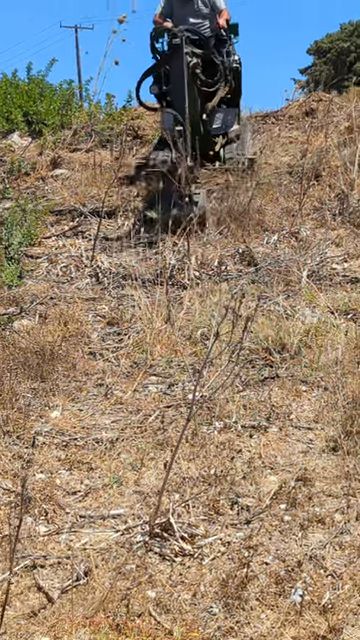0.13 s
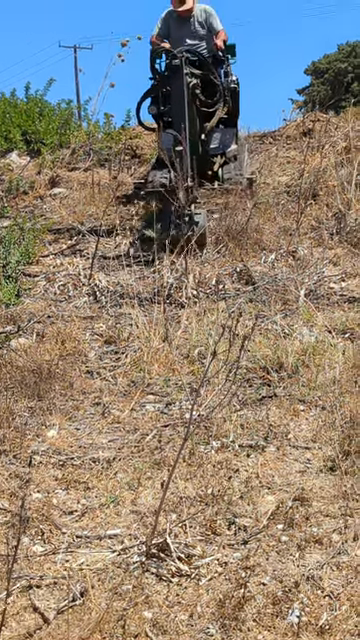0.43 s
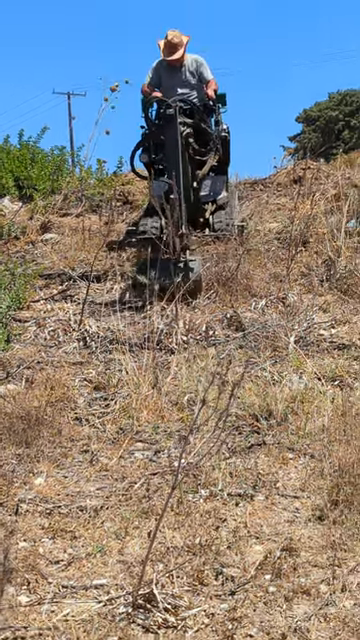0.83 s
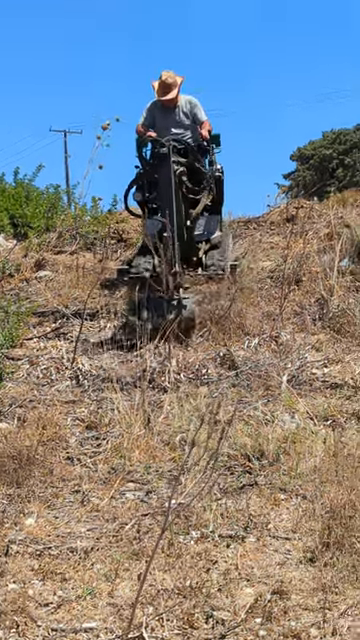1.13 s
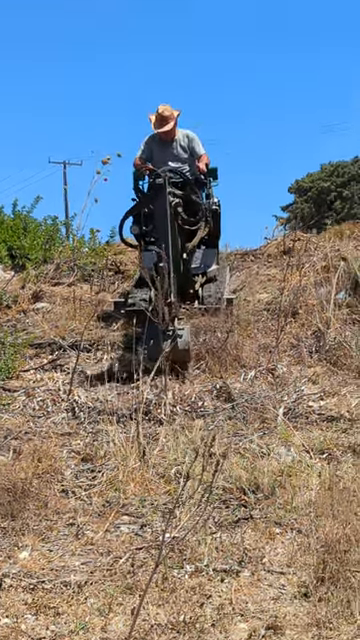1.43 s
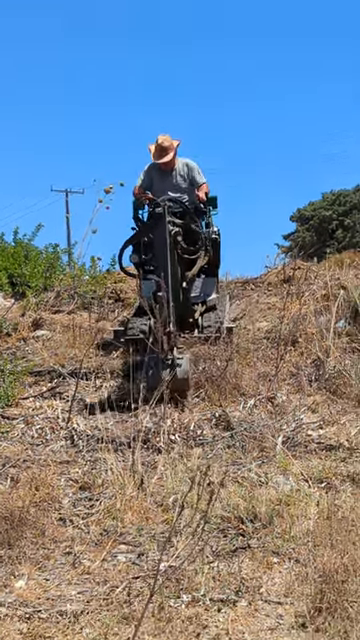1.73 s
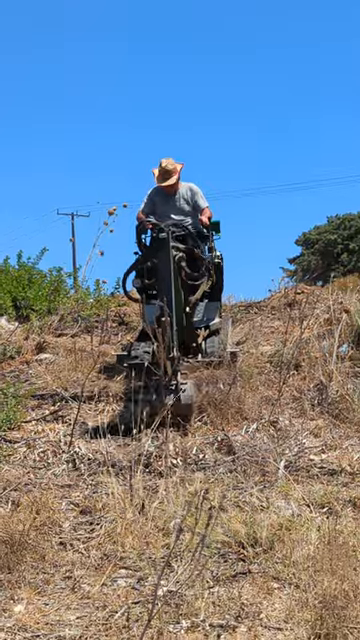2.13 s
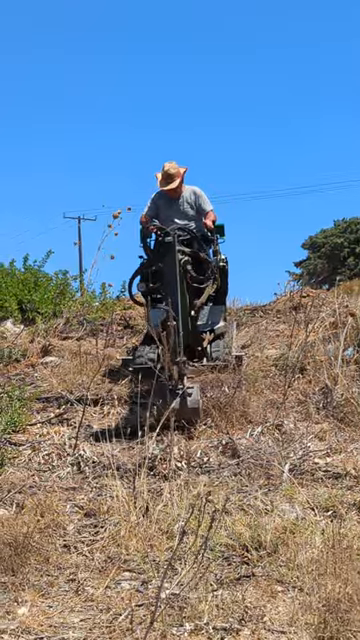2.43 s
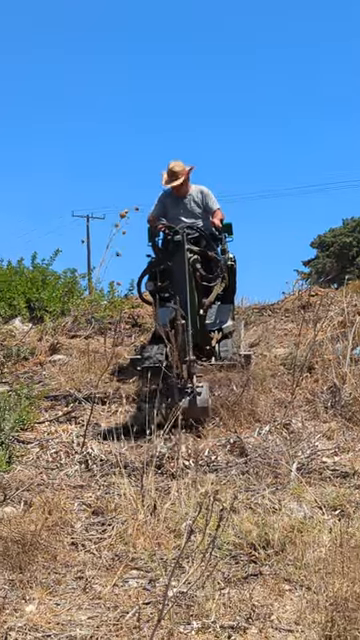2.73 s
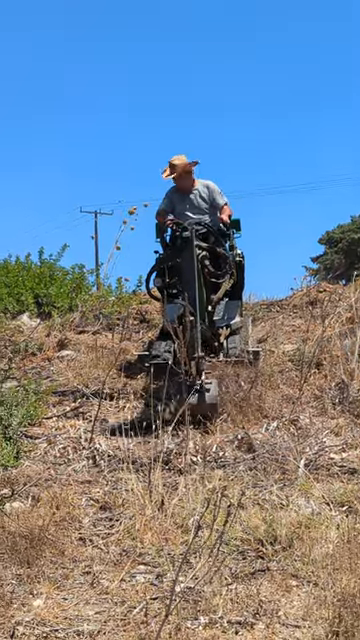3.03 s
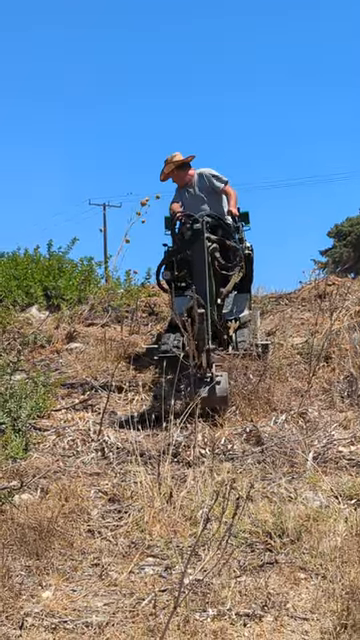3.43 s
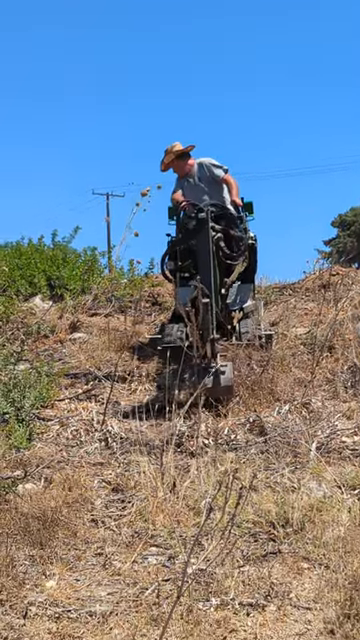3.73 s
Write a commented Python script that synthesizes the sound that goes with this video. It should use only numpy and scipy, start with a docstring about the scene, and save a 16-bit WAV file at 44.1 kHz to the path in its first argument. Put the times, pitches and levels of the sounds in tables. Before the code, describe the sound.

Steady rapid chugging of a small digger's engine in the open, with mechanical rattle, light linkage clanks and brittle snaps. Low gusts thud on the stereo handheld microphone throughout, over a thin insect hiss.

```python
"""Small excavator on a dry slope

A single-cylinder engine holds fairly steady revs: pulse-driven exhaust harmonics thump, noise that jumps
at each firing clatters and rings the casing, and damped sine clusters make the loose linkage clank.
Patchy noise hisses as insects in the scrub; noise bursts are snapping dry stalks. Low noise swells are gusts
on the two microphone ports of a handheld camera, whose limiter ducks the whole mix under strong peaks."""
import sys
import numpy as np
from scipy import signal
from scipy.fft import rfft, irfft, next_fast_len
from scipy.io import wavfile
from scipy.ndimage import uniform_filter1d, minimum_filter1d, map_coordinates

SR = 44100
rng = np.random.default_rng(int(sys.argv[2]) if len(sys.argv) > 2 else 0)


def generate_wav(signal):
    """Clip the signal to [-1, 1] and save it as 16-bit WAV at the path in sys.argv[1]."""
    frames = np.transpose(np.atleast_2d(signal))
    scaled = np.clip(frames, -1, 1) * 32767
    pcm = np.round(scaled).astype(np.int16)
    wavfile.write(sys.argv[1], SR, pcm)


def magnitude_from_level(level_db):
    """Linear magnitude for a level in decibels (20 dB per decade)."""
    exponent = np.asarray(level_db, float) / 20
    return 10 ** exponent


N = 171990


def unit(x):
    """Scales a signal to rms 1."""
    return x / np.sqrt(np.mean(x ** 2) + 1e-20)


def along(points, hz):
    """Reads (frequency, value) points on a logarithmic frequency axis."""
    f, v = np.transpose(points)
    return np.interp(np.log(hz + 1), np.log(f + 1), v)


def curve(rows):
    """Draws straight lines through (time, value) rows, one value per sample."""
    return np.interp(np.arange(N) / SR, *np.transpose(rows))


def wobble(rate):
    """A smooth random curve with rate knots a second."""
    knots = rng.standard_normal(int(N * rate / SR) + 4)
    return map_coordinates(knots, [np.arange(N) * rate / SR])


def filtered(x, response):
    """Multiplies the spectrum of x by a complex response of frequency."""
    size = next_fast_len(N + 8192)
    spectrum = rfft(x, size) * response(np.fft.rfftfreq(size, 1 / SR))
    return irfft(spectrum, size)[..., :N]


def patchy(depth_db):
    """Two unrelated noises sharing time-frequency patches of random gain."""
    z = signal.stft(rng.standard_normal((2, N)), nperseg=512)[2]
    field = uniform_filter1d(rng.standard_normal(z.shape[1:]), size=6, axis=0)
    field = uniform_filter1d(field, size=10, axis=1)
    return signal.istft(z * magnitude_from_level(depth_db * unit(field)), nperseg=512)[1][:, :N]


def pair(noises, gain, alike):
    """Colours two noises and mixes them to a left-right likeness, at rms 1."""
    def shares(hz):
        angle = np.arccos(np.clip(along(alike, hz), -1, 1)) / 2
        return gain(hz) * [np.cos(angle), np.sin(angle)]

    mid, side = filtered(noises, shares)
    return unit(np.array([mid + side, mid - side]))


def train(times, sizes):
    """Impulses, each shared between its two neighbouring samples."""
    at = np.clip(times * SR, 0, N - 2)
    k = at.astype(int)
    return np.bincount(k, sizes * (1 + k - at), N) + np.bincount(k + 1, sizes * (at - k), N)


# Engine speed: time_s, firings_per_s
ENGINE_SPEED = [(0, 25.12), (.5, 25.3), (.68, 25.4), (1.05, 25.26), (1.28, 25.42), (1.8, 25.48),
                (2.3, 25.27), (2.8, 25.38), (3.3, 25.12), (3.9, 25.19)]


def firings():
    """Times of the power strokes, one at each whole turn of the summed firing rate."""
    first_s = .0125
    turns = np.cumsum(curve(ENGINE_SPEED)) / SR - first_s * ENGINE_SPEED[0][1]
    return np.interp(np.arange(int(turns[-1]) + 1), turns, np.arange(N) / SR)


# Exhaust harmonics at 1, 2, 3 .. times the firing rate, before the exhaust gain: level_db
EXHAUST_ORDERS = [-60, -41, -37.5, -31, -25.5, -29.5, -45, -36, -33, -52, -45, -43, -59, -50, -46, -48.5,
                  -46.5, -46.5, -51, -47.5, -43.5, -54, -57, -58.5, -49, -47, -50, -51, -49.5, -46, -62,
                  -63, -57, -50.5, -54, -46.5, -55.5, -66, -56, -59.5, -67, -76, -60, -53, -66, -60, -58,
                  -68]


def exhaust(times):
    """Harmonics phased as a suck-and-push puff, its inverted echo and a valve pop; upper phases scatter."""
    exhaust_db, size_scatter_db, jitter_s = 1.5, 1.6, .00013
    puff_s, valve_s, valve_gain = .002, .028, .4  # a weaker pop as the valve shuts
    echo_s, echo_gain, echo_dull_hz = .0115, .95, 450  # the puff returns inverted from the pipe's end
    blur_from, blur_radians = 12, 1.25  # casing and ground scatter the orders above this one
    order = np.arange(len(EXHAUST_ORDERS)) + 1
    rate = np.mean(curve(ENGINE_SPEED))
    blur = blur_radians * rng.standard_normal(len(order)) * (order > blur_from)

    def late(f, s):
        return np.exp(-2j * np.pi * f * s)

    def cycle(f):
        valve = valve_gain * late(f, valve_s)
        echo = 1j * echo_gain * late(f, echo_s) / (1 + (f / echo_dull_hz) ** 2)
        return late(f, puff_s) * (valve - 1j + echo)

    def pipe(f):
        gain = magnitude_from_level(np.interp(f / rate, [0, *order, 2 * order[-1]], [-80, *EXHAUST_ORDERS, -100]))
        phase = np.angle(cycle(f)) + np.interp(f / rate, order, blur)  # cycle gives phase only
        return gain * np.exp(1j * phase)

    chance = rng.standard_normal((len(times), 2))
    sizes = magnitude_from_level(exhaust_db + size_scatter_db * chance[:, 1])
    pulses = train(times + jitter_s * chance[:, 0], sizes)
    return filtered(pulses, pipe) * SR / rate / np.sqrt(2)  # a steady harmonic gets rms 1 before gain


# Clatter colour before the casing rings, relative: pitch_hz, level_db
CLATTER_COLOUR = [(330, -26), (560, -4.5), (740, 0.5), (840, -8), (960, -11.5), (1150, -7.5), (1330, -10.5),
                  (1530, -14.5), (1800, -10.5), (2150, -11), (2600, -20), (3400, -17.5), (4300, -19.5),
                  (4800, -24.5), (5500, -29), (8000, -27.5), (11000, -53), (19000, -120)]
# Casing rings, added to the plain response of 1: pitch_hz, width_hz, level_db
CASING_RINGS = [(1122, 34, -1.5), (2102, 61, 0), (3744, 76, 4.5), (4187, 195, 4), (4656, 72, 9),
                (6080, 68, 3)]
# Left-right likeness of the clatter: pitch_hz, likeness
CLATTER_ALIKE = [(300, 1), (800, .98), (1250, .93), (2000, .85), (3000, .68), (4300, .8), (5600, .3),
                 (9000, .35)]
# Clatter follows the engine load, before the clatter gain: time_s, level_db
LOAD_LEVEL = [(0.0, -42.5), (1.0, -42), (1.24, -41), (2.11, -42.5), (2.56, -40), (2.78, -42), (3.9, -40.5)]


def clatter(times):
    """Mechanical noise that jumps at each firing and rings the casing."""
    rise_s, decay_s, scatter_db, share = 0.0013, 0.016, 1, 0.18
    clatter_db = 8.5
    t = np.arange(SR // 10) / SR
    blow = np.exp(-t / decay_s) * (1 - np.exp(-t / rise_s))
    blows = train(times, magnitude_from_level(scatter_db * rng.standard_normal(len(times))))
    knock = signal.fftconvolve(blows, blow)[:N]
    gate = 1 + share * (knock / knock.mean() - 1)

    def colour(f):
        rings = 1 + sum(magnitude_from_level(db) * w * w / (w * w + 4 * (f - hz) ** 2) for hz, w, db in CASING_RINGS)
        return magnitude_from_level(along(CLATTER_COLOUR, f)) * rings

    noise = pair(patchy(depth_db=0.66) * gate, colour, CLATTER_ALIKE)
    return magnitude_from_level(curve(LOAD_LEVEL) + clatter_db + 0.21 * wobble(4.3)) * noise


# Insect hiss colour, relative: pitch_hz, level_db
INSECT_COLOUR = [(3000, -40), (5000, -30), (6500, -17), (8000, -21), (8800, 2), (9500, -4), (10400, 8),
                 (11500, 4.5), (12400, 2.5), (13200, -14), (14000, -9.5), (15000, -9), (15800, -27)]


def insects():
    """A wide chorus of patchy high noise in the scrub, its level pulsing as a faint buzz."""
    chorus_db, buzz_hz, buzz_depth = -41.5, 149, 0.064
    buzz = 1 + buzz_depth * np.sin(2 * np.pi * buzz_hz * np.arange(N) / SR + 2.0 * wobble(3.3))
    hiss = pair(patchy(depth_db=1.4), lambda f: magnitude_from_level(along(INSECT_COLOUR, f)), [(9000, 0.35)])
    return magnitude_from_level(chorus_db + 0.31 * wobble(6.8)) * buzz * hiss


def firm(x):
    """Noise with its own slow swells evened out, so that each gust lands in full."""
    power = uniform_filter1d(x ** 2, size=700, axis=1)
    return unit(x / (power + 0.029) ** (0.82 / 2))


# Gusts at the ports, before the thud and edge gains:
# middle_s, width_s (at half power), level_db, left_over_right_db, upper_edge_over_thud_db
GUST_TABLE = [(0.087, 0.029, -16, -2, -6.5), (0.14, 0.021, -11.5, -1.2, -12.5),
              (0.209, 0.02, -14.5, 0.5, -10), (0.418, 0.03, -12.5, 3.5, -16.5),
              (0.486, 0.015, -11, 2.5, -18), (0.575, 0.018, -21, 1, -9), (0.759, 0.019, -11, 0, -19),
              (0.839, 0.0045, -17, 10, -29), (0.905, 0.016, -13, 2.5, -19), (0.969, 0.011, -16.5, 2.5, -33),
              (1.088, 0.086, -16, 1.5, -15.5), (1.126, 0.0087, -23, 8, -27), (1.253, 0.07, -18, 2.5, -15.5),
              (1.407, 0.017, -16.5, 2, -27), (1.5, 0.016, -16.5, -3, -23), (1.547, 0.01, -14, -2, -12.5),
              (1.588, 0.024, -14.5, 0.5, -15), (1.648, 0.019, -13, 0.5, -7.5),
              (1.764, 0.034, -24.5, -1, -28), (1.8, 0.0067, -19.5, 7, -30),
              (1.876, 0.019, -15.5, -0.5, -36), (1.948, 0.02, -15, 7, -36), (2.019, 0.025, -22.5, 2.5, -25),
              (2.102, 0.016, -26.5, 8, -21), (2.136, 0.019, -28, 2, -18), (2.273, 0.028, -17.5, 3, -10.5),
              (2.393, 0.063, -27.5, 2, -24), (2.471, 0.032, -19, 3.5, -25),
              (2.543, 0.033, -13.5, -0.5, -16), (2.691, 0.011, -21, 2, -22), (2.762, 0.017, -9, 2.5, -12),
              (2.971, 0.025, -20, -2.5, -23), (3.028, 0.015, -20, 3.5, -16), (3.163, 0.029, -18, 1, -19.5),
              (3.256, 0.025, -22.8, 1.0, -28), (3.287, 0.0066, -23, -1, -5), (3.329, 0.022, -15.5, 1, -24),
              (3.41, 0.024, -14, 1.5, -20), (3.497, 0.032, -28.5, 5.8, -8), (3.65, 0.015, -26.5, 2, -16),
              (3.705, 0.019, -24.5, 8.5, -20)]
# Gust thud colour, relative: pitch_hz, level_db
THUD_COLOUR = [(20, -59), (40, -55), (70, -19), (130, -0.5), (200, 1.5), (320, -4), (450, -16),
               (700, -40.5), (1500, -120)]
# Colour of the gusts' upper edge, relative: pitch_hz, level_db
EDGE_COLOUR = [(60, -92), (250, -15), (400, -2), (520, 0), (650, -11), (900, -32), (1800, -120)]
# Breeze between gusts, before its gain and random drift: time_s, level_db
BREEZE_LEVEL = [(0.0, -39), (0.06, -20), (0.34, -38), (1.09, -28), (1.7, -32), (2.47, -31), (2.6, -29),
                (2.91, -36), (3.2, -30), (3.9, -38)]
# Breeze rumble colour, relative: pitch_hz, level_db
BREEZE_COLOUR = [(15, -35), (26, -43), (44, -6), (88, -8.5), (135, -3), (190, -6.5), (280, -31), (500, -31),
                 (1200, -120)]
# Left-right likeness of the wind, negative where opposed: pitch_hz, likeness
PORT_WIND_ALIKE = [(30, .1), (70, -.4), (130, -.15), (300, -.3)]


def wind():
    """Gusts swell on both ports at once with unlike, partly opposed pressure, over a rumbling breeze."""
    thud_db, edge_gain_db = 6, 5.5
    skirt_db, skirt_wider = -17, 1.67  # a faint wider swell under each gust
    breeze_db, breeze_left_db = 3, 3.5  # the second is left over right
    t = np.arange(N) / SR
    thud, edge = np.full((2, N), 1e-9), np.full((2, N), 1e-9)  # powers
    for middle, width, db, left_db, edge_db in GUST_TABLE:
        u = (t - middle) / max(width, .005)
        swell = np.exp(-4 * np.log(2) * u ** 2) + magnitude_from_level(2 * skirt_db) * np.exp(-(u / skirt_wider) ** 2)
        power = magnitude_from_level([[db + left_db / 2], [db - left_db / 2]]) ** 2 * swell
        thud += power
        edge += magnitude_from_level(2 * edge_db) * power

    def noise(points):
        return pair(rng.standard_normal((2, N)), lambda f: magnitude_from_level(along(points, f)), PORT_WIND_ALIKE)

    balance = breeze_left_db * np.array([[.5], [-.5]])
    drift = 2.9 * np.array([wobble(26.14), wobble(19)])
    breeze = magnitude_from_level(curve(BREEZE_LEVEL) + breeze_db + balance + drift) * noise(BREEZE_COLOUR)
    thuds = magnitude_from_level(thud_db) * np.sqrt(thud) * firm(noise(THUD_COLOUR))
    edges = magnitude_from_level(edge_gain_db) * np.sqrt(edge) * firm(noise(EDGE_COLOUR))
    return thuds + edges + breeze


# Dry grass stirs, before the random grain: time_s, level_db
RUSTLE_LEVEL = [(0, -53), (.42, -46), (.55, -54), (2.2, -65), (3.2, -50), (3.5, -66), (3.9, -66)]
# Snapping stems, level before the snap gain and grain: start_s, level_db, t60_s, rise_s (start to peak)
SNAP_TABLE = [(0.1136, -18.5, 0.052, 0.0029), (0.9824, -25, 0.045, 0.002), (1.3394, -29, 0.05, 0.002),
              (1.961, -28, .02, .001), (1.99, -20.5, 0.02, 0.0011), (2.217, -29, 0.035, 0.002),
              (2.2285, -29, 0.024, .001), (3.2378, -20, 0.027, 0.001), (.305, -35, .08, 0.0035),
              (3.2564, -29, 0.064, 0.0015)]
# Stalk colour, relative: pitch_hz, level_db
STALK_COLOUR = [(1200, -40), (3000, -3.5), (6000, 2.5), (9000, 9), (15500, -1)]


def stalks():
    """Over a faint rustle dry stems snap: short bright grainy bursts of noise."""
    snap_db = -9.5
    t = np.arange(N) / SR
    shape = magnitude_from_level(curve(RUSTLE_LEVEL))
    for start, db, t60, rise in SNAP_TABLE:
        peak = start + rise
        slope_s = np.where(t > peak, t60, 4 * rise)  # seconds per 60 dB, after and before the peak
        shape += magnitude_from_level(db + snap_db - 60 * np.abs(t - peak) / slope_s)
    noise = pair(rng.standard_normal((2, N)), lambda f: magnitude_from_level(along(STALK_COLOUR, f)), [(5000, 0.1)])
    return shape * magnitude_from_level(2.8 * wobble(400)) * noise


# Clanks of the loose linkage, before the clank gain: start_s, level_db
CLANK_TABLE = [(.2109, -35), (1.0392, -29.5), (1.0801, -32), (1.155, -32), (1.1987, -26), (1.2376, -33),
               (1.339, -25), (1.352, -33), (1.5977, -33), (2.3017, -26), (2.5386, -25), (3.5673, -31.5)]
# Linkage ring modes, before random scatter: pitch_hz, level_db, t60_s
LINKAGE_MODES = [(1440, -9, .03), (1720, -7.5, 0.055), (1890, -10, 0.045), (2080, -1.5, 0.061),
                 (2243, -4.5, 0.076)]


def clanks():
    """The loose linkage knocks and rings briefly in damped modes, a little different each time."""
    clank_db, rise_s = 1, .001
    out, t = np.zeros(N + SR), np.arange(SR // 5) / SR
    for start, db in CLANK_TABLE:
        ring = np.zeros(len(t))
        for hz, level, t60 in LINKAGE_MODES:
            decay = magnitude_from_level(level + rng.normal(0, 2) - 60 * t / t60)
            ring += decay * np.sin(2 * np.pi * hz * rng.normal(1, 0.021) * t)
        out[round(start * SR):][:len(t)] += magnitude_from_level(db + clank_db) * ring * (1 - np.exp(-t / rise_s))
    return out[:N]


# Balance of the two ports for all but the wind: pitch_hz, left_over_right_db
PORT_BALANCE = [(60, 18), (130, -2), (290, -1), (640, 0.0), (1410, 0.5), (3100, -1), (6820, 1.5),
                (15000, .6)]


def scene():
    """All sound from away reaches the left port first; wind is made at the ports."""
    lead_s = .000143
    times = firings()
    away = exhaust(times) + clatter(times) + insects() + stalks() + clanks()
    half = np.array([[.5], [-.5]])

    def ports(f):
        return magnitude_from_level(half * along(PORT_BALANCE, f)) * np.exp(2j * np.pi * f * half * lead_s)

    return filtered(away, ports) + wind()


def low_pass(x):
    """Removes everything above the highest recorded frequency."""
    return signal.sosfilt(signal.butter(12, 15830, fs=SR, output="sos"), x)


# Microphone low end: pitch_hz, level_db
MICROPHONE_LOW_END = [(24, 4), (33, -5), (41, -8), (52, 0)]


def record(dry):
    """The microphone shapes the low end, then a look-ahead peak limiter ducks both channels together."""
    ceiling, hold_s, recover_s = .95, 0.0033, 0.015
    dry = filtered(dry, lambda f: magnitude_from_level(along(MICROPHONE_LOW_END, f)))
    need = np.minimum(1, ceiling / (np.abs(dry).max(axis=0) + 1e-9))
    hold, recover = int(hold_s * SR) + 1, int(recover_s * SR) + 1
    gain = uniform_filter1d(minimum_filter1d(need, hold + recover), recover)
    return low_pass(dry * gain)


dry = scene()
out = record(dry)
generate_wav(out)
```